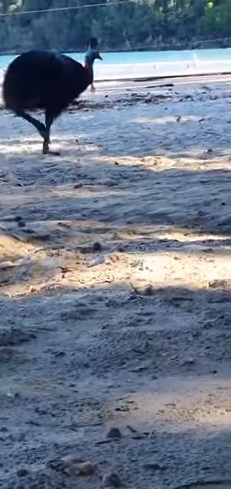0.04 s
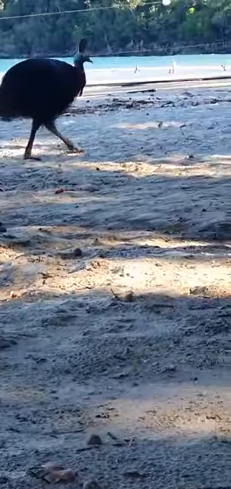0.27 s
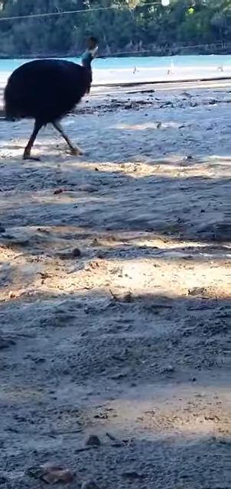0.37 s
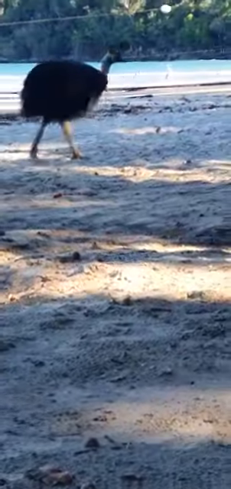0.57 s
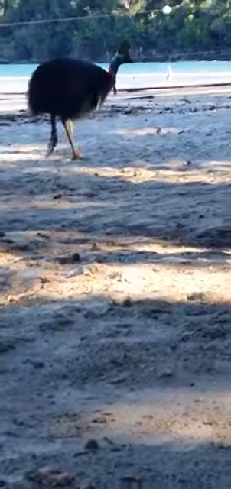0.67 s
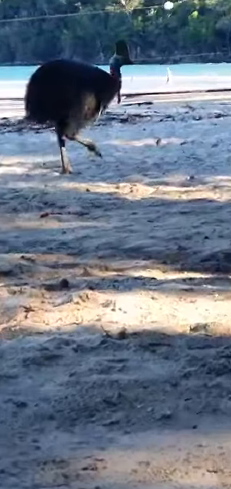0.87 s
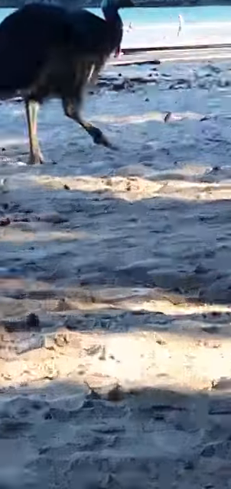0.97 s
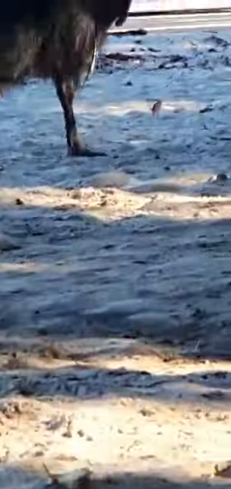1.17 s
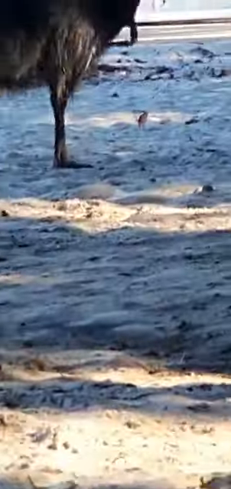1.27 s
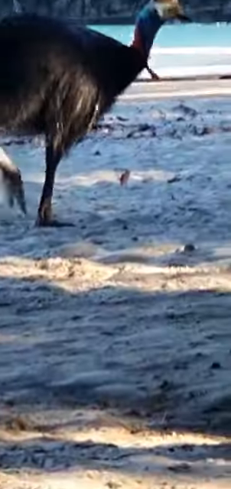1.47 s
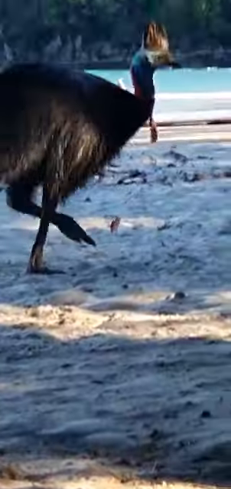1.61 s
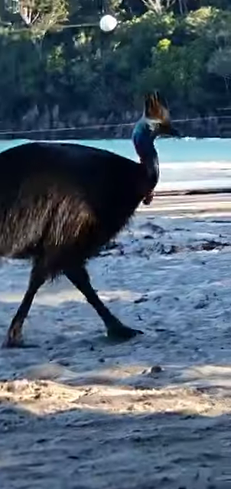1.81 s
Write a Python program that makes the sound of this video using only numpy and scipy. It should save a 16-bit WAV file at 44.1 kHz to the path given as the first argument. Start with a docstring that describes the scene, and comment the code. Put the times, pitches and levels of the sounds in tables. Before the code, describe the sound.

Wind buffets the microphone on a beach, rumbling and fluttering with low thumps and short rasps. A strong gust gives way to a lull, then a weaker gust with small pops. Distant surf hisses faintly throughout.

```python
"""Beach wind on a camera microphone

On a beach, wind buffets a camera's two microphone ports over the steady hiss of distant surf.
A strong gust, a lull, then a weaker gust: eddies rumble, flutter and thump at the ports and burst
into short rasps. The right port keeps its rumble only in strong wind, and pops as the wind drops."""
import sys
import numpy as np
from scipy import signal
from scipy.fft import rfft, irfft
from scipy.io import wavfile

SR = 44100
rng = np.random.default_rng(int(sys.argv[2]) if len(sys.argv) > 2 else 0)


def generate_wav(sig):
    """Save sig (samples, or channels by samples) to the path in sys.argv[1] as 16-bit PCM at SR."""
    pcm = np.round(np.clip(np.atleast_2d(sig).T, -1, 1) * 32767).astype(np.int16)
    wavfile.write(sys.argv[1], SR, pcm)


N = 81585
T, HZ = np.arange(N) / SR, np.fft.rfftfreq(N, 1 / SR) + 1e-3

# strength of the wind's low rumble: time_s, level_db
RUMBLE_LEVEL = [(0, -25), (.07, -37.5), (.14, -27), (.19, -42), (.23, -23.5), (.38, -23.5), (.445, -23.5),
                (.49, -28.5), (.53, -22), (.595, -48), (.64, -23.5), (.70, -24), (.74, -17), (.80, -27.5),
                (.89, -38), (1.08, -42.5), (1.19, -26), (1.28, -31), (1.41, -27), (1.53, -36.5),
                (1.68, -41.5), (1.82, -28.5)]
# strength of the wind's mid-range flutter: time_s, level_db
FLUTTER_LEVEL = [(0, -31), (.04, -32), (.09, -43.5), (.19, -45.5), (.255, -27.5), (.35, -30.5),
                 (.41, -23.5), (.51, -21.5), (.605, -30), (.645, -22), (.75, -20), (.80, -32.5),
                 (.885, -38.5), (1.07, -48), (1.12, -32.5), (1.2, -30), (1.44, -29.5), (1.51, -40.5),
                 (1.73, -40.5), (1.79, -41.5)]


def amp(db):
    """Decibels to gain."""
    return 10 ** (np.asarray(db) / 20)


def unit_rms(x):
    """Scales each channel to rms 1."""
    return x / np.sqrt(np.mean(x ** 2, -1, keepdims=True) + 1e-20)


def curve(points):
    """Joins (time_s, value) points by straight lines."""
    return np.interp(T, *np.transpose(points))


def colour(points):
    """Gain at each frequency from (frequency_hz, level_db) points."""
    hz, db = np.transpose(points)
    return amp(np.interp(np.log(HZ), np.log(hz), db))


def bell(x, centre, width):
    """Bell curve that falls from 1 to 1/e at one width from its centre."""
    return np.exp(-((x - centre) / width) ** 2)


def band(low_hz, top_hz, low_order, top_order):
    """Gain of a pass band whose skirts fall 6 dB per octave for each order."""
    return 1 / np.sqrt((1 + (low_hz / HZ) ** (2 * low_order)) * (1 + (HZ / top_hz) ** (2 * top_order)))


def filtered(x, gain):
    """Applies a gain at each frequency."""
    return irfft(rfft(x) * gain, N)


def noise(gain):
    """Unrelated noise at each port, with the given spectrum."""
    return unit_rms(filtered(rng.standard_normal((2, N)), gain))


def steadied(x, span_s):
    """Evens out a noise's slow swells; those much quicker than span_s stay."""
    power = abs(filtered(x ** 2, bell(HZ, 0, 1 / span_s)))
    return x / np.sqrt(power + 0.0011)


def wander(rate_hz):
    """Random drift at each port, mostly slower than rate_hz."""
    return noise(bell(HZ, 0, rate_hz))


def ports(left_over_right_db):
    """Gains of the left and right port."""
    return amp(np.array([[.5], [-.5]]) * left_over_right_db)


def surf():
    """Wide, even hiss of distant water; its lower wash shimmers, and a narrow sheen lies on top."""
    # spectrum of the far surf: frequency_hz, level_db
    spectrum = [(150, -0.5), (550, 6), (1000, -1), (1500, -5), (2300, -0.5), (3400, -7.5), (5000, -11),
                (8900, -12), (9900, -17.5), (12300, -18.5), (14300, -30.5)]
    # surf as it reaches the microphone: time_s, level_db
    surf_level = [(0, -49), (.75, -48), (1.05, -50), (1.85, -46.5)]
    # narrow band of high hiss: time_s, level_db
    sheen_level = [(0, -80), (.65, -64), (1.85, -67)]
    hiss = noise(colour(spectrum))
    wash = filtered(hiss, 1 / (1 + (HZ / 5000) ** 4))
    shimmer = amp(0.8 * wander(rate_hz=42)[0])
    sheen = noise(bell(HZ, centre=8380, width=510)) * amp(curve(sheen_level))
    return (hiss + wash * (shimmer - 1)) * amp(curve(surf_level)) + sheen


def rumble():
    """Lumpy low turbulence, unrelated at the two ports and a little weaker on the right."""
    # spectrum of the rumble: frequency_hz, level_db
    spectrum = [(15, -24), (30, -55), (48, 0), (70, 1.5), (110, -6), (170, -9), (260, -14.5), (500, -30.5),
                (1500, -100)]
    turbulence = steadied(noise(colour(spectrum)), span_s=0.042)
    return turbulence * amp(curve(RUMBLE_LEVEL)) * amp([[0], [-1.5]])


def flutter():
    """Mid-range turbulence that comes in quick clumps, partly shared by the ports."""
    # spectrum of the flutter: frequency_hz, level_db
    spectrum = [(100, 3.5), (210, 3.5), (300, 0), (400, 2), (620, -10), (850, -19.5), (1300, -27),
                (2200, -33.5), (5000, -76)]
    own_db, shared_db = 2.6 * wander(rate_hz=170), 2.73 * wander(rate_hz=123)[0]
    clumps = steadied(noise(colour(spectrum)) * amp(own_db + shared_db), span_s=0.06)
    return clumps * amp(curve(FLUTTER_LEVEL) - 0.5) * ports(left_over_right_db=-4)


def sheltered(wind):
    """Takes the bass out of the right port whenever the wind is light."""
    light_wind_db, loss_per_db, max_loss_db, bass_hz = -22, 4.9, 30, 266
    loss_db = np.clip((light_wind_db - curve(RUMBLE_LEVEL)) * loss_per_db, 0, max_loss_db)
    left, right = wind
    bass = filtered(right, 1 / (1 + (HZ / bass_hz) ** 10))
    return np.array([left, right - bass * (1 - amp(-loss_db))])


def thumps():
    """Each large eddy swings the pressure to and fro, nearly in step at both ports."""
    # large eddies: time_s, peak_db, pitch_hz, half_length_s, left_over_right_db
    eddies = [(0.011, -33, 119, 0.0079, -21), (.262, -29, 180, 0.01, 0), (0.336, -12.5, 78.5, 0.023, -4),
              (0.476, -10, 171, 0.0029, 0.5), (0.54, -29.5, 97, 0.022, -20.5),
              (.674, -19.5, 161, 0.0069, -1), (0.734, -11.5, 66.4, 0.0092, 7),
              (1.133, -30.5, 208, 0.0054, 6), (1.322, -27, 92, 0.011, 6), (1.398, -35, 76.5, 0.02, 21),
              (1.457, -16, 75, 0.011, 5.5), (1.698, -39, 124, 0.0067, 35), (1.814, -32.5, 69.6, 0.03, -3)]
    out = np.zeros((2, N))
    phase_drift = .09 * wander(rate_hz=150)
    for time_s, peak_db, pitch_hz, half_length_s, side_db in eddies:
        swing = np.sin(2 * np.pi * (pitch_hz * (T - time_s) + rng.random() + phase_drift))
        out += amp(peak_db) * ports(side_db) * bell(T, time_s, half_length_s) * swing
    return out


def buffets():
    """Short swells of rough turbulence with sharp pressure cusps; faster eddies reach higher."""
    # small fast eddies that rasp: time_s, level_db, time_scale_s, top_hz, left_over_right_db
    eddies = [(0.246, -39.5, 0.0049, 670, 11), (0.304, -25, 0.015, 730, 2.5), (0.413, -25, 0.012, 980, 8),
              (0.463, -19, 0.0095, 746, 0.5), (0.482, -22.5, 0.003, 720, 7),
              (0.509, -24.5, 0.0045, 690, -12.5), (0.527, -27.5, 0.0035, 880, 10.5),
              (0.575, -20, 0.0062, 860, 8), (0.583, -14, 0.0076, 510, -3.5),
              (0.584, -16.5, 0.0031, 1030, -4), (.6, -22, 0.0024, 940, -11.5),
              (0.663, -17.5, 0.0098, 644, 3), (0.761, -20, 0.009, 1030, 4), (0.777, -29, 0.0016, 1130, -25),
              (0.837, -41.5, 0.018, 840, -13), (0.919, -27.5, 0.0062, 616, 3.5),
              (0.954, -32, 0.0054, 497, -2.5), (1.023, -32, 0.012, 503, -5), (1.136, -25, 0.0095, 490, 1.5),
              (1.258, -31, 0.0091, 610, 9), (1.286, -30, 0.019, 466, -8), (1.78, -33, 0.017, 376, -0.5)]
    rise_share, fall_share, cusp_depth = 0.25, 0.85, 0.098
    out = np.zeros((2, N))
    for time_s, level_db, time_scale_s, top_hz, side_db in eddies:
        turbulence = steadied(noise(band(252, top_hz, low_order=2, top_order=5.14)), span_s=.01)
        rasp = unit_rms(turbulence + cusp_depth * (turbulence ** 2 - 1))
        width_s = time_scale_s * np.where(T < time_s, rise_share, fall_share)
        out += amp(level_db) * ports(side_db) * bell(T, time_s, width_s) * rasp
    return filtered(out, band(215, 2640, low_order=5.8, top_order=4.3))


def pops():
    """Pressure spikes without bass at the right port, among a crackle that grows with the flutter."""
    # sharp pops at the right port: time_s, peak_db
    sharp_pops = [(0.0686, -23.5), (0.7673, -13), (.8445, -19), (1.341, -22), (1.4979, -22), (1.524, -20),
                  (1.5859, -17.5), (1.6067, -19), (1.631, -22), (1.671, -22.5), (1.840, -23)]
    crackle_per_s, left_db = 75, -23
    crackle_db = -9.5 + 0.67 * curve(FLUTTER_LEVEL)
    onsets = rng.random(N) < crackle_per_s / SR
    spikes = onsets * rng.uniform(-1, 1, N) * amp(crackle_db)
    for time_s, peak_db in sharp_pops:
        spikes[round(time_s * SR)] += amp(peak_db) * rng.choice([-1, 1])
    brief_ring = 1 + bell(HZ, centre=450, width=140)
    response = band(306, 1300, low_order=11, top_order=2.76) * brief_ring
    impulse_peak = irfft(response, N)[0]
    return filtered(spikes, response) / impulse_peak * amp([[left_db], [0]])


def scene():
    """Wind right at the microphone, with the surf far behind it."""
    return sheltered(rumble() + flutter()) + thumps() + buffets() + pops() + surf()


def record(dry):
    """The camera's band limit cuts the highest treble."""
    edge_hz = 14350
    low_pass = signal.firwin(511, edge_hz, window=("kaiser", 9), fs=SR)
    return signal.oaconvolve(dry, low_pass[None], "same")


dry = scene()
out = record(dry)
generate_wav(out)
```